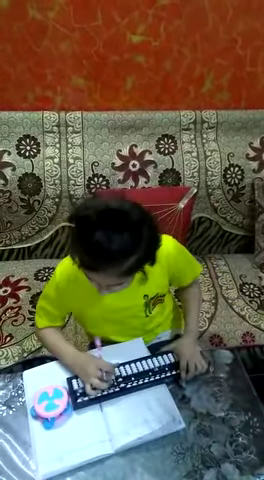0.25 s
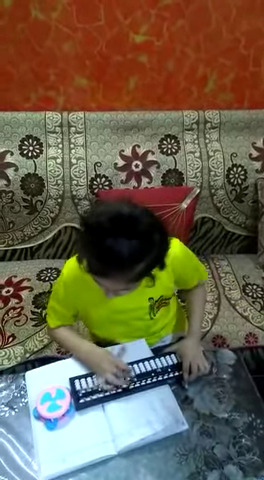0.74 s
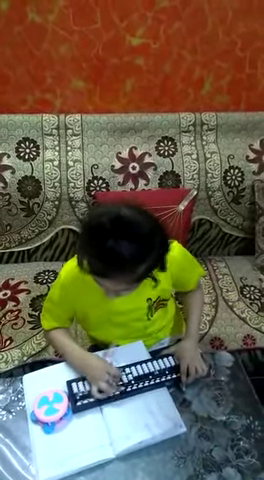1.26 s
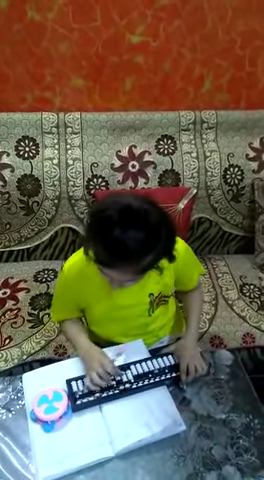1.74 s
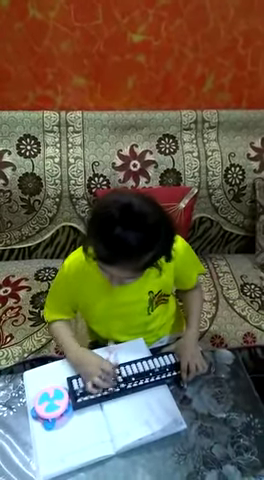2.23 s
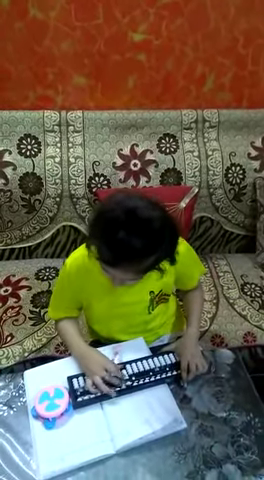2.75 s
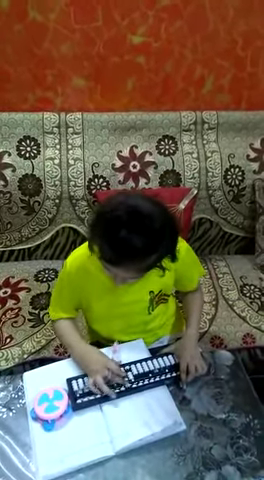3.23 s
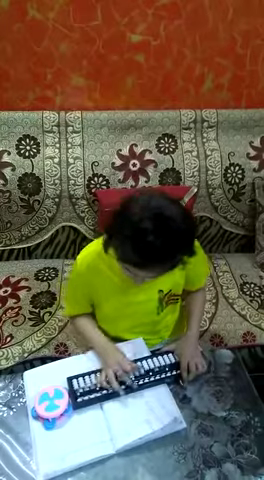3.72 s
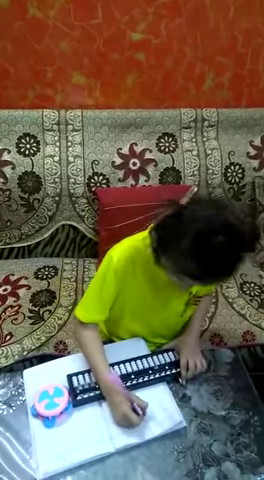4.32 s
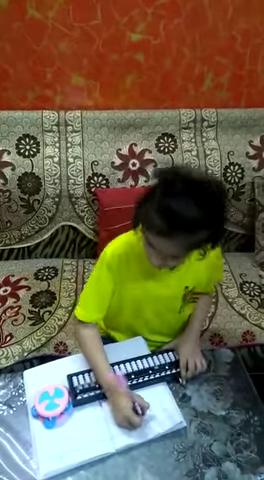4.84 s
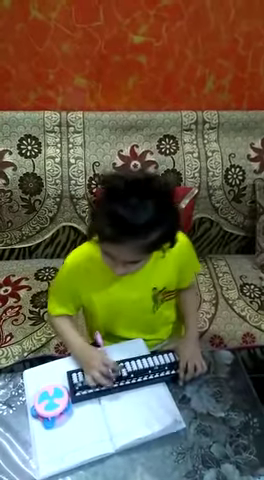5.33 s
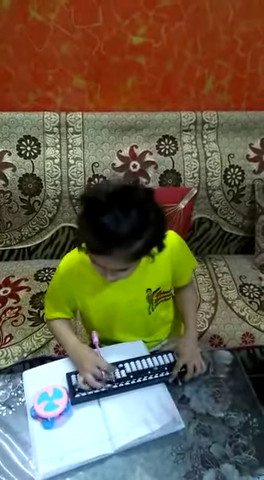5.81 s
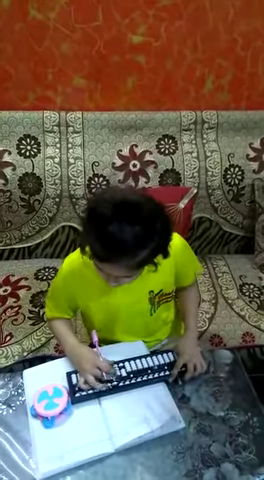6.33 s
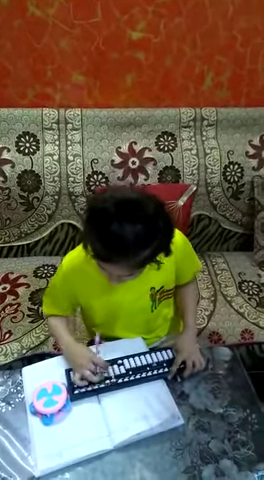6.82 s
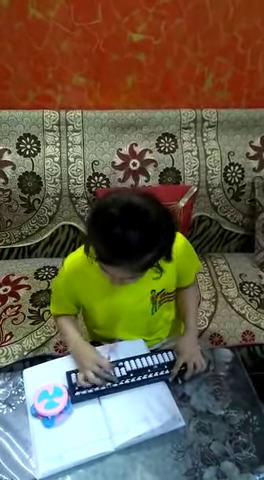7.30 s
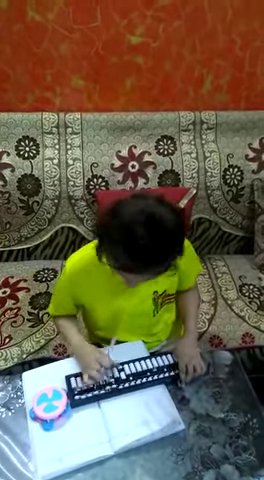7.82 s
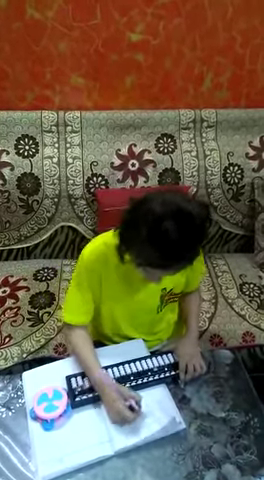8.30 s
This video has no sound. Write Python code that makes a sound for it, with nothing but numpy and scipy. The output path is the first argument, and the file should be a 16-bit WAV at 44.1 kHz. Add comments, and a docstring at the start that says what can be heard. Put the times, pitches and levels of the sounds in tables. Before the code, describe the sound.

Plastic abacus beads click in quick, uneven runs over the steady hum of a fan in a hard-walled room.

```python
"""A fan's strong motor hum, and over it at once the clack of plastic abacus beads, in a hard-walled room.
Fingers flick the beads against bar and frame; each rings briefly and the walls answer. Midway a pencil
scratches faintly. The abacus is to one side of a two-port microphone; the fan drones from the other
side, near enough for its draught to buffet the ports. The recorder widens the image by subtracting
from each port a delayed copy of the other."""
import sys
import numpy as np
from scipy import signal
from scipy.fft import rfft, irfft
from scipy.io import wavfile
from scipy.ndimage import uniform_filter1d

SR = 44100
rng = np.random.default_rng(int(sys.argv[2]) if len(sys.argv) > 2 else 0)


def store_pcm(level_fs):
    """Save levels as 16-bit WAV."""
    pcm = np.round(np.clip(level_fs, -1, 1) * 32767).astype(np.int16)
    wavfile.write(sys.argv[1], SR, np.atleast_2d(pcm).T)


N = 377496

# Levels in the tables are relative; each source adds its own gain.
# draught on the ports: (time [s], level [dB])
DRAUGHT_LEVEL = [(0, -50), (0.3, -47), (0.6, -47), (0.9, -38), (1.05, -44), (1.15, -53), (1.6, -52),
                 (2.1, -46), (2.45, -44), (2.55, -52), (3, -51), (3.5, -50), (3.9, -47), (4.3, -49),
                 (4.55, -45), (4.67, -42), (4.78, -32), (4.88, -39), (4.96, -29), (5.05, -37), (5.2, -35),
                 (5.4, -42), (5.6, -42), (5.9, -50), (6.2, -49), (6.5, -40), (6.7, -44), (6.85, -50),
                 (7.2, -49), (7.5, -47), (7.8, -41), (8, -53), (8.3, -44), (8.55, -44)]
# spectrum of its buffeting: (frequency [Hz], level [dB])
BUFFET_SPECTRUM = [(20, -6), (45, -11), (70, 6.5), (120, 9), (170, -18.5), (300, -43.5), (900, -87.5)]
# the fan's drone sinks, swells back and throbs: (time [s], hum level [dB], air level [dB])
FAN_LEVELS = [(0.0, -26, -31.5), (0.12, -23.5, -34.5), (0.21, -19, -30.5), (0.36, -23.5, -33.5),
              (0.4, -18, -31.5), (0.5, -24.5, -36), (0.86, -22.5, -33), (0.93, -20, -31.5),
              (1.05, -23, -32), (1.1, -32, -43.5), (1.36, -30.5, -41.5), (1.45, -29.5, -39),
              (1.6, -31, -38.5), (1.64, -25.5, -37.5), (1.79, -29.5, -35.5), (1.81, -24.5, -37),
              (2.24, -22.5, -32), (2.31, -26, -34.5), (2.34, -23, -32), (2.46, -23, -34), (2.5, -30, -39),
              (3.0, -26, -37), (3.07, -22.5, -36), (3.19, -29.5, -39.5), (3.24, -24, -35), (3.5, -25, -35),
              (3.74, -25, -34.5), (3.77, -20.5, -33.5), (3.86, -21, -31), (3.91, -29.5, -35.5),
              (3.98, -25, -35.5), (4.24, -25, -35), (4.34, -19, -33), (4.46, -24.5, -31), (4.48, -21, -32),
              (4.98, -22, -32), (5.01, -18, -32.5), (5.17, -21.5, -30.5), (5.2, -19, -31),
              (5.51, -23.5, -31.5), (5.53, -18.5, -31.5), (5.7, -23.5, -32.5), (5.72, -19, -31.5),
              (5.89, -25, -35.5), (6.08, -21, -30.5), (6.22, -25.5, -34.5), (6.25, -21, -33.5),
              (6.53, -21.5, -31.5), (6.7, -24, -34), (6.91, -29, -40), (6.98, -24.5, -36.5),
              (7.1, -27.5, -37.5), (7.77, -20.5, -31.5), (7.87, -21, -32), (7.96, -31.5, -34),
              (8.01, -26, -36), (8.15, -27.5, -35), (8.2, -23, -35.5), (8.44, -23.5, -33), (8.56, -19, -32)]
# rush of the fan: (frequency [Hz], level [dB])
AIR_SPECTRUM = [(90, -1.5), (150, 0.5), (230, 0.5), (300, 17.5), (450, 1.5), (550, -1.5), (1000, -1),
                (1800, -9), (2300, -10), (3000, -25), (4000, -41), (6000, -45), (11000, -53.5),
                (14000, -45.5)]
# how alike that rush is at the two ports: (frequency [Hz], coherence [0-1])
AIR_COHERENCE = [(150, 1), (400, 0.55), (1000, 0.82), (2000, 0), (5000, 0)]
# motor tones: (frequency [Hz], level [dB], lag at the second port [samples], width [Hz])
MOTOR_TONES = [(123.5, -24, 2.5, 6.7), (187.4, -19, 8, 1.5), (265.3, -21, 1.5, 11), (298.4, 1.5, 15.4, 1.5),
               (332.2, -9.5, 4.4, 5.4), (395.2, -14, 6.2, 16.7), (425.8, -19, 1.4, 12.6),
               (516.3, -28.5, 3.5, 30), (620.6, -27, 1.7, 24), (724.5, -30.5, 4.5, 20)]
# pencil on paper: (time [s], level [dB])
PENCIL_LEVEL = [(4.28, -74), (4.312, -68), (4.86, -70), (4.908, -54), (4.916, -69), (5.036, -68),
                (5.04, -52)]
# answer of the hard walls: (frequency [Hz], level [dB], t60 [s])
ROOM_RESPONSE = [(1000, -9, .4), (2000, 6, 0.37), (2900, -8, 0.7), (4300, 0, 0.43), (5400, -0.5, 0.61),
                 (8100, -1, .45), (9000, -5.5, .45), (11300, -2.5, 0.51), (15500, -29.5, 0.48)]
# bead strikes: (time [s], level [dB], pitch [Hz], rattle [dB], crack [dB], frame knock [dB],
# room send [dB], bead tone in the room [dB]); the last five are relative to the strike's level
BEAD_STRIKES = [(0.189, -35.5, 2600, -9, -9, -27, 4, -11), (0.1916, -31.5, 2750, -6, -14, -19, -4.5, -14),
                (0.305, -31, 3200, -12, -1.5, -22, 0.5, -12), (0.4539, -36, 2560, 0, -27, -22, 9, -14),
                (0.4558, -10.5, 3250, -17, -21, -19, -7, -14),
                (0.5342, -20, 2700, -16, -9.5, -20, 2, -15.5),
                (0.5834, -14.5, 3440, -7.5, -13, -17, -2, -17.5),
                (0.7083, -27, 3720, -8, -8, -25, 0.5, -16),
                (0.7407, -19.5, 3350, -19, -21, -27, -3.5, -16.5), (0.8444, -37, 3030, -9, -2, -22, 7, -13),
                (1.0169, -19, 3830, -6, -17, -31, 0, -16.5), (1.0655, -17.5, 4570, 0, -25, -21, -9.5, -14),
                (1.0665, -10.5, 3010, -21, -14.5, -28, -7.5, -16), (1.1822, -35, 3490, -2, -5, -22, 1, -14),
                (1.2136, -22, 4020, -9.5, -20, -17, -3, -16), (1.319, -32, 3500, -6, -9, -16, 0, -16),
                (1.3343, -20.5, 3880, -11, -18, -21, -3.5, -15),
                (1.4157, -11, 3240, -12, -26, -30, -5, -16.5), (1.511, -23.5, 2930, -14, -14, -22, 1, -18),
                (1.543, -28, 3630, -13, -12, -24, -6, -17), (1.55, -29, 3900, -1, -5, -22, 1, -17),
                (1.6207, -16.5, 2870, -8, -22, -16, -4.5, -16), (1.6566, -31, 2870, -14, -14, -19, 3, -16),
                (1.6884, -17.5, 3450, -16, -28, -24, -3, -16), (1.766, -31, 2660, -7, -9, -22, -2, -16),
                (1.768, -25.5, 3640, -11, -13, -19, 2, -17), (1.8098, -34, 3550, -17, -7.5, -22, 4.5, -14),
                (1.8256, -21.5, 2960, -7.5, -12, -11, -3, -17), (1.874, -30.5, 2860, -8, -16, -22, 4, -19),
                (1.9001, -29, 3270, -14, -14, -16, 8, -15), (1.9295, -19.5, 3000, -8, -17, -12, 1, -15.5),
                (2.0326, -24, 2660, -13, -14, -20, -1, -18),
                (2.0815, -34.5, 3140, -17, -12, -36, 15.5, -14), (2.0996, -25, 2880, -9, -22, -24, -3, -14),
                (2.1249, -18, 3130, -9, -12, -17.5, 3, -16), (2.166, -22, 3000, -15, -18, -23.5, -5, -16),
                (2.18, -18.5, 3320, -13, -15, -22, -2, -14), (2.1984, -11, 3140, -24, -32, -28, -9, -17),
                (2.2757, -21.5, 3040, -8, -4, -28.5, -0.5, -17),
                (2.3116, -17, 3700, -21, -19, -34.5, -9, -15),
                (2.4216, -32.5, 3510, -21, -17, -13.5, 1, -16),
                (2.485, -8.5, 3300, -9, -17.5, -20.5, -7.5, -18),
                (2.602, -24, 3160, -14, -7.5, -26, -0.5, -16),
                (2.6578, -14.5, 2950, -11, -18, -11.5, -2.5, -15),
                (2.7987, -13, 3000, -19, -27, -36, -5.5, -16.5),
                (2.8747, -33.5, 2900, -4, -8.5, -19, 0, -14), (2.9123, -29.5, 2780, -10, -8, -22, 0.5, -16),
                (3.1164, -21, 2900, -9, -10, -19, 1, -15), (3.239, -22, 3100, -12, -25, -30, 2, -14),
                (3.2569, -15, 4240, -26, -14, -35, -5, -15.5), (3.356, -31, 3400, -10, -12, -17, 0, -14),
                (3.3958, -20, 3620, -3, -11, -20, -3, -16), (3.5095, -31, 3500, -12, -7, -16, 1.5, -18),
                (3.6285, -32.5, 3080, -6.5, 1, -17.5, 6, -14), (3.755, -25.5, 3720, -12, -12, -22, 1, -16),
                (3.7997, -17, 4090, -3, -21, -25, -2.5, -17), (3.8387, -20, 3750, -14, -15, -27, 4, -15.5),
                (3.8751, -13.5, 2900, -7.5, -17, -13, -6.5, -14),
                (4.0342, -36, 3040, -13, -16, -29, -4, -14), (4.0728, -22.5, 3000, -9, -9, -25, 1, -15),
                (5.0429, -38, 2850, -38, -39, -20, 2.5, -6),
                (5.0944, -15.5, 3080, -10.5, -20.5, -12, 1.5, -15),
                (5.243, -48, 2880, -6, -16, -22, -15, -14), (5.2817, -18, 2970, -14, -15.5, -20, 2, -17),
                (5.405, -28.5, 2920, -6.5, -11, -15, 1, -16), (5.453, -35, 3100, -1, -10, -12, -13, -14),
                (5.4923, -29, 2950, -8.5, -29, -22, -8, -14), (5.5987, -35, 3640, -16, -2.5, -22, 2, -19),
                (5.695, -20.5, 2920, -19, -9.5, -15, 2.5, -13.5),
                (5.7763, -24, 2970, -1, -6.5, -20, -3, -17), (5.8316, -24, 3060, -10, -18, -26, 2, -16),
                (5.8574, -26.5, 3170, -10, -9, -18, -1, -17), (5.9364, -33, 3520, -3, -10, -30, 0, -19),
                (6.0467, -22.5, 3980, -17, -14, -9, 4.5, -15.5),
                (6.0467, -18.5, 3000, -14, -9.5, -7, -8, -14),
                (6.0694, -12.5, 3050, -10, -21, -22, -3.5, -14),
                (6.1898, -19.5, 2880, -12.5, -29, -19, -1.5, -15), (6.254, -28, 2970, -5, -9, -16, -1, -17),
                (6.3044, -24, 3630, -13, -9.5, -16, -1, -16), (6.5633, -19, 3520, -9, -9, -13, 0.5, -15),
                (6.6732, -17, 3660, -25, -38, -17, -5, -15), (6.6992, -21, 3650, -8, -12.5, -10, 6, -15),
                (6.7273, -8.5, 3380, -19, -22.5, -26, -18, -16),
                (6.8306, -26, 2960, -11, -6.5, -22, -1, -14), (6.9057, -31, 2700, -10, -12, -22, 4.5, -15),
                (6.996, -33.5, 3480, -7, -16, -17, 5.5, -14),
                (7.0464, -14.5, 3500, -6.5, -18, -26, -2, -16.5),
                (7.216, -22.5, 3840, -12, -20, -13, -1, -16.5), (7.3048, -41, 3400, -11, -7, -22, -2, -17),
                (7.3183, -30, 4140, -7, -7.5, -25, 0, -18), (7.4123, -33, 4400, -8, -13, -22, -5, -18),
                (7.461, -13.5, 4030, -36, -23.5, -36, -4, -14.5),
                (7.5482, -24.5, 3830, -18, -22, -8, 1.5, -14), (7.643, -35, 3500, -6, -3.5, -20, 2, -19),
                (7.7253, -37.5, 3590, -17, -6.5, -22, 2, -17), (7.7742, -25, 2970, -11, -11, -22, 4, -18),
                (7.7991, -13.5, 3700, -15, -21, -37, -0.5, -16.5),
                (7.8287, -12.5, 3300, -13.5, -30, -16, -4, -15), (7.882, -17, 4030, -9, -9, -28, -3, -16),
                (7.9049, -21, 3800, -8, -12, -33, 0, -15), (7.9171, -9, 2870, -16, -15.5, -12.5, -3, -15),
                (8.0297, -32.5, 3270, -6, -21, -30, 14, -14),
                (8.0413, -10.5, 3700, -21, -29, -21, -8.5, -15.5),
                (8.2287, -13, 4760, -16, -14, -24, -4, -18.5)]
# modes of the abacus frame: (frequency [Hz], level [dB], t60 [s])
FRAME_MODES = [(965, 7.5, 0.009), (1458, 3, 0.015), (1842, 7, 0.011)]
# thin high pings: (time [s], level [dB], pitch [Hz], t60 [s])
HIGH_PINGS = [(2.0822, -33, 10500, 0.04), (3.8402, -25.5, 11430, 0.032), (4.0357, -30, 10400, 0.031),
              (5.244, -40, 10400, 0.04)]
# a dull tap on the frame: (time [s], level [dB], pitch [Hz], t60 [s])
FRAME_TAPS = [(5.3344, -24.5, 1510, 0.016)]
# shading of the first port, on the side away from the abacus: (frequency [Hz], gain [dB])
PORT_SHADE = [(1000, -11), (3000, -18.5), (4500, -14.5), (6000, -6.5), (8000, -8), (10000, -18.5),
              (15000, -16)]
# the copy each port takes from the other: (frequency [Hz], gain [dB], lag [samples])
CROSSFEED = [(60, -1.5, 19.6), (2250, -.5, 19.6), (4650, -6, 19.0), (7400, -9, 17.9), (10000, -13, 18.0),
             (15000, -20, 18.0)]

AIR_LAG_SAMPLES, AIR_FAR_DB = 17.1, -4   # at the second port, farther from the fan
PENCIL_GRAINS_PER_S = 900
ROOM_DB, ROOM_BUILD_S, ROOM_FLICKER_DB, ROOM_SECOND_PORT_DB = -19, 0.0021, 3, 2
OPENING_RING_DB = -16   # the room still rings from a clack just before the start
BEAD_T60_S, RATTLE_T60_S, CRACK_T60_S = 0.0096, 0.015, 0.017
SLIDE_DB, SLIDE_RISE_S = -13, 0.0091
BEAD_LAG_SAMPLES = 4.42   # at the first port, farther from the abacus
STOPBAND_HZ = 16500


def amp(db):
    """Decibels to gain."""
    return 10 ** (np.asarray(db) / 20)


def rms_one(x):
    """Scale to rms 1."""
    return x / np.sqrt(np.mean(x ** 2) + 1e-20)


def in_time(rows):
    """Columns of a time table, one value per sample."""
    times, *columns = np.transpose(rows)
    return [np.interp(np.arange(N) / SR, times, column) for column in columns]


def at_hz(points, hz, column=1):
    """Read a table column on a log-frequency axis."""
    points = np.array(points)
    return np.interp(np.log(hz + 1), np.log(points[:, 0] + 1), points[:, column])


def coloured(x, points):
    """Filter by a table of (frequency [Hz], gain [dB])."""
    return irfft(rfft(x) * amp(at_hz(points, np.fft.rfftfreq(N, 1 / SR))), N)


def delay(lag):
    """Spectrum of a delay in samples."""
    return np.exp(-2j * np.pi * np.fft.rfftfreq(N) * lag)


def band(x, low_hz, high_hz):
    """Band-pass."""
    sos = signal.butter(2, [low_hz, min(high_hz, .45 * SR)], "band", fs=SR, output="sos")
    return signal.sosfilt(sos, x)


def dying(t, t60):
    """Envelope that falls 60 dB in t60."""
    return amp(-60 * t / t60)


def ring(t, hz, t60):
    """One struck mode: a dying sine."""
    return np.sin(2 * np.pi * hz * t) * dying(t, t60)


def draught():
    """Moving air buffets the microphone: a low rumble, separate at each port."""
    rumble = rms_one(coloured(rng.standard_normal((2, N)), BUFFET_SPECTRUM))
    return amp(in_time(DRAUGHT_LEVEL)[0] - 4.0) * rumble


def fan_air(air_db):
    """Broad rush of the fan; the far port hears part of it later, the rest is its own."""
    hz = np.fft.rfftfreq(N, 1 / SR)
    near, own = rfft(rng.standard_normal((2, N)))
    alike = np.clip(at_hz(AIR_COHERENCE, hz), 0, 1)
    far = amp(AIR_FAR_DB) * (alike * near * delay(AIR_LAG_SAMPLES) + np.sqrt(1 - alike ** 2) * own)
    rush = irfft(np.array([near, far]) * amp(at_hz(AIR_SPECTRUM, hz)), N)
    return amp(air_db + 5) * rms_one(rush)


def fan_motor(hum_db):
    """Motor hum: each tone is a steady part plus narrow noise, so it wavers in level."""
    t, hum = np.arange(N) / SR, np.zeros((2, N))
    hold = 50   # samples per step of the slow noise
    for hz, level_db, lag, width_hz in MOTOR_TONES:
        pole = np.exp(-np.pi * width_hz * hold / SR)
        white = rng.standard_normal((2, 2, N // hold + 502))
        slow = signal.lfilter([1], [1, -pole], white[0] + 1j * white[1])
        slow = rms_one(slow.view(float)).view(complex)[:, 500:]   # once the filter has settled
        common, side = np.repeat(slow, hold, axis=1)[:, :N]
        steady = 10 / width_hz
        wobble = steady + common + 0.21 * side * np.array([[1], [-1]])
        wobble = uniform_filter1d(wobble.real, hold) + 1j * uniform_filter1d(wobble.imag, hold)
        carrier = np.exp(2j * np.pi * hz * (t - np.array([[0], [lag / SR]])))
        hum += amp(level_db) * (wobble * carrier).real / np.hypot(steady, 1)
    return amp(hum_db + 2.5) * hum


def pencil():
    """Faint uneven grains as the tip catches on paper fibres."""
    t = np.arange(N) / SR
    writing = (t > PENCIL_LEVEL[0][0]) & (t < PENCIL_LEVEL[-1][0])
    grains = rng.standard_normal((2, N)) * (rng.random(N) < PENCIL_GRAINS_PER_S / SR)
    scratch = rms_one(band(band(grains, 2200, 4300), 2200, 4300))
    return amp(in_time(PENCIL_LEVEL)[0] - 4.5) * writing * scratch


def room(send):
    """Hard walls: each band stores the energy sent in and returns dying noise, separate at each port."""
    tail, white = 0, rng.standard_normal((2, 2, N))
    edges_hz = 700 * 2 ** np.arange(0, 4.7, 1 / 5)
    build = np.exp(-1 / (ROOM_BUILD_S * SR))   # the reflections need a moment to gather
    for k, (low, high) in enumerate(zip(edges_hz, edges_hz[1:])):
        hz = np.sqrt(low * high)
        retained = dying(2 / SR, at_hz(ROOM_RESPONSE, hz, column=2))   # energy left after one sample
        energy = band(send + 1e-12, low, min(high, .44 * SR)) ** 2 * SR / (2 * (high - low))
        stored = signal.lfilter([1], [1, -retained], energy)
        gathered = signal.lfilter([1 - build], [1, -build], stored)
        steps = rng.standard_normal(N // 900 + 2)   # each band wavers on its own
        flicker = np.interp(np.arange(N) / 900, np.arange(len(steps)), steps)
        gain = amp(at_hz(ROOM_RESPONSE, hz) + ROOM_FLICKER_DB * flicker)
        tail = tail + gain * np.sqrt(gathered + 1e-20) * band(white[k % 2], low, high)
    return amp(ROOM_DB) * tail


def bead_clack(t, noise, hz, rattle_db, crack_db, knock_db):
    """A bead lands: it rings and chatters on its rod, with a high rattle, a crack and a frame knock."""
    tone = ring(t, hz, BEAD_T60_S)
    chatter = .3 * rms_one(band(noise[0], 2150, 5900)) * dying(t, t60=0.04)
    rattle = rms_one(band(noise[1], 3900, 6260)) * dying(t, RATTLE_T60_S)
    crack = rms_one(band(noise[2], 4900, 11800)) * dying(t, CRACK_T60_S)
    knock = sum(amp(db + 4.4 * rng.random()) * ring(t, mode_hz, t60) for mode_hz, db, t60 in FRAME_MODES)
    clack = tone + chatter + amp(rattle_db + 9.5) * rattle + amp(crack_db + 10) * crack
    clack += amp(knock_db) * knock
    return clack * np.minimum(t / 0.001, 1)   # the contact takes a moment


def abacus():
    """Flicked beads slide and clack, with a few pings and a tap. Returns direct sound and room send."""
    t = np.arange(2000) / SR
    direct, send = np.zeros((2, N + len(t)))
    send[0] = amp(OPENING_RING_DB)
    for start_s, level_db, hz, rattle_db, crack_db, knock_db, send_db, ring_db in BEAD_STRIKES:
        at = round(start_s * SR)
        noise = rng.standard_normal((3, len(t)))
        # the bead hisses along its rod just before it lands
        slide = band(noise[2], 2500, 14000)[-600:] * np.exp(-t[600:0:-1] / SLIDE_RISE_S)
        direct[at - 600:at] += amp(level_db + crack_db / 2 + SLIDE_DB) * slide
        clack = amp(level_db + 3) * bead_clack(t, noise, hz, rattle_db, crack_db, knock_db)
        direct[at:at + len(t)] += clack
        tone_in_room = amp(send_db + level_db + ring_db) * ring(t, hz, t60=0.016)
        send[at:at + len(t)] += amp(send_db - 18) * clack + tone_in_room
        send[at] += amp(send_db + level_db)   # the first contact spreads evenly through the room
    for start_s, level_db, hz, t60 in HIGH_PINGS + FRAME_TAPS:
        at = round(start_s * SR)
        ping = amp(level_db + 11.5) * ring(t, hz, t60) * np.minimum(t / .002, 1)
        direct[at:at + len(t)] += ping
        send[at:at + len(t)] += amp(-23) * ping
    return direct[:N], send[:N]


def scene():
    """At the microphone: fan on the first port's side, abacus on the second's, the room all round."""
    direct, send = abacus()
    shaded = coloured(irfft(rfft(direct) * delay(BEAD_LAG_SAMPLES), N), PORT_SHADE)
    tail = room(send) * amp([[0], [ROOM_SECOND_PORT_DB]])
    hum_db, air_db = in_time(FAN_LEVELS)
    return np.array([shaded, direct]) + tail + fan_motor(hum_db) + fan_air(air_db) + draught() + pencil()


def record(dry):
    """The recorder subtracts from each port a delayed, duller copy of the other and cuts lows and top."""
    hz = np.fft.rfftfreq(N, 1 / SR)
    cross = amp(at_hz(CROSSFEED, hz)) * delay(at_hz(CROSSFEED, hz, column=2))
    wide = dry - irfft(rfft(dry[::-1]) * cross, N)
    low_cut = signal.butter(2, 45, "high", fs=SR, output="sos")
    microphone_rolloff = signal.butter(6, 15200, fs=SR, output="sos")
    top_cut = signal.cheby2(18, 70, STOPBAND_HZ, fs=SR, output="sos")
    for stage in (low_cut, microphone_rolloff, top_cut):
        wide = signal.sosfilt(stage, wide)
    return np.clip(wide, -1, 1)


dry = scene()
out = record(dry)
store_pcm(out)
```